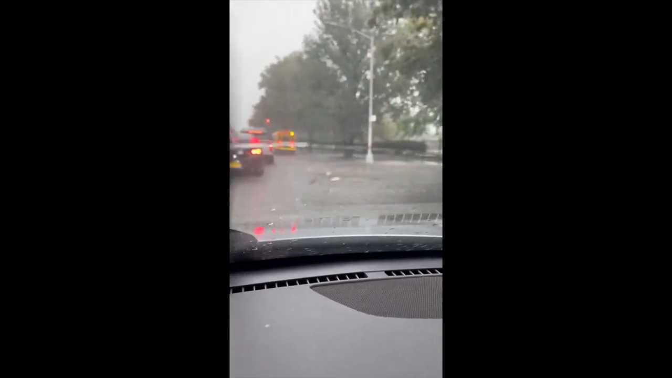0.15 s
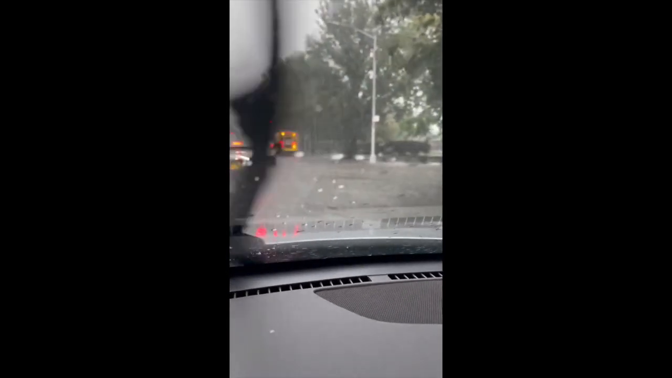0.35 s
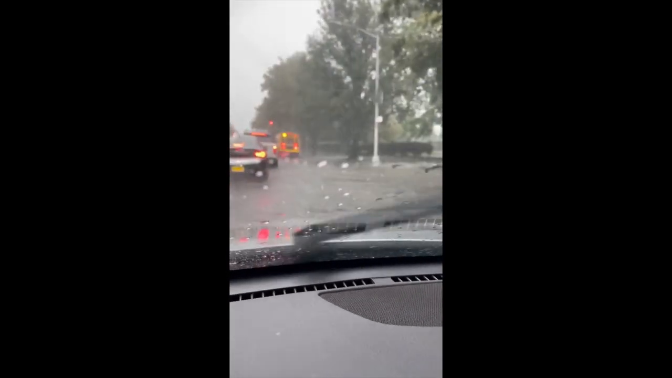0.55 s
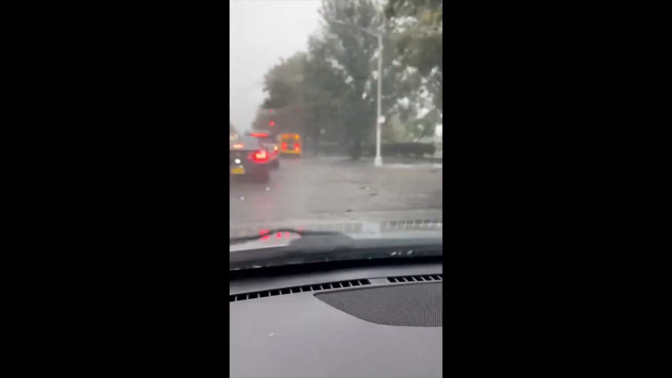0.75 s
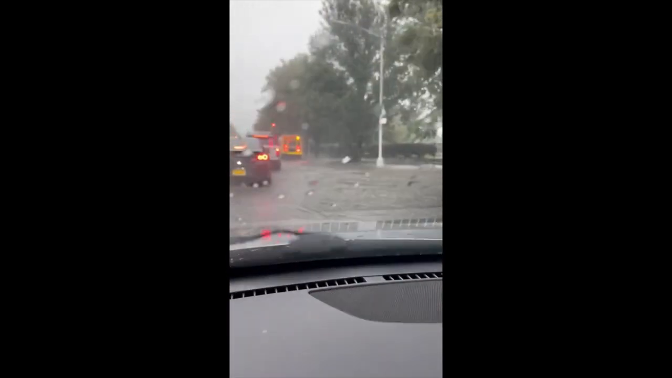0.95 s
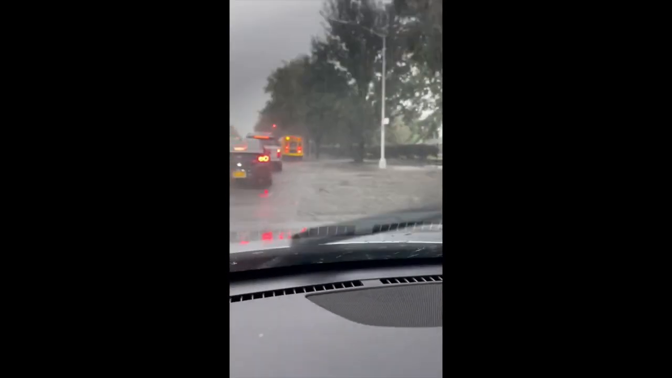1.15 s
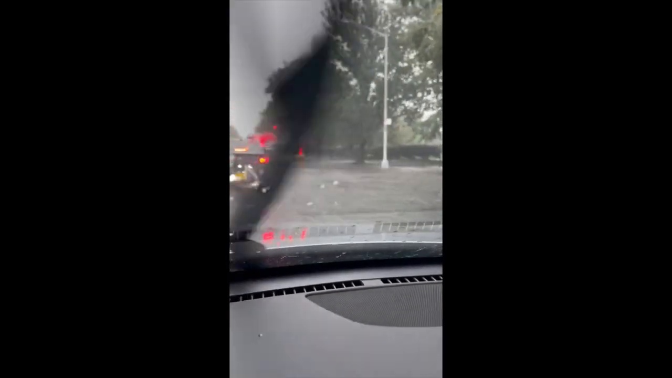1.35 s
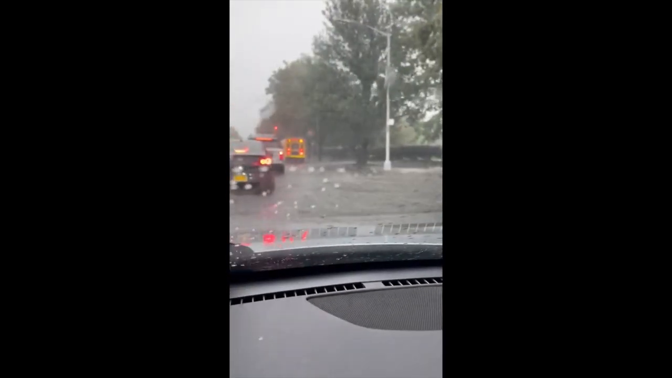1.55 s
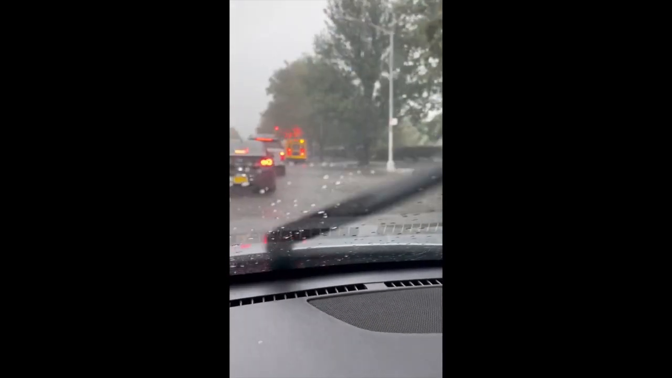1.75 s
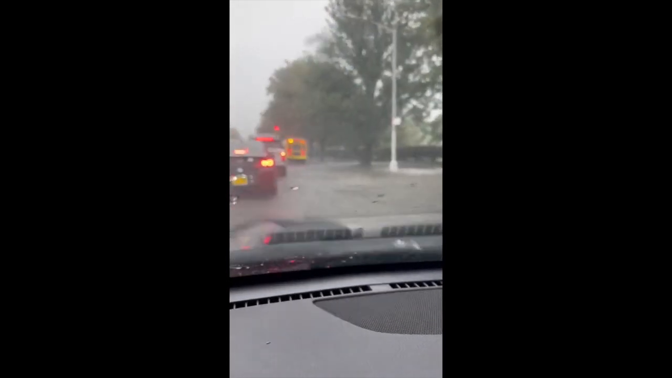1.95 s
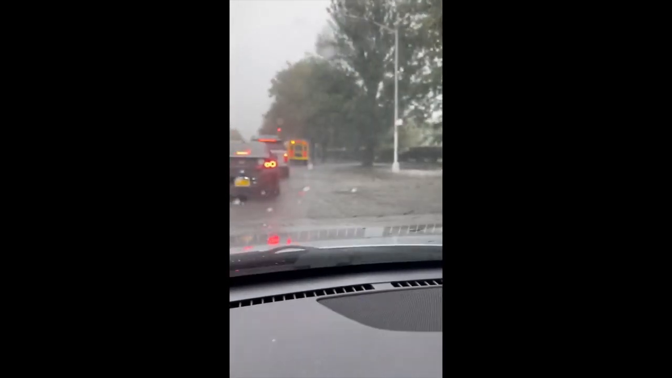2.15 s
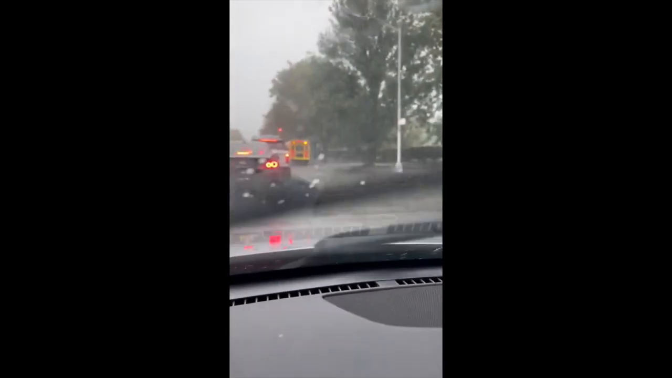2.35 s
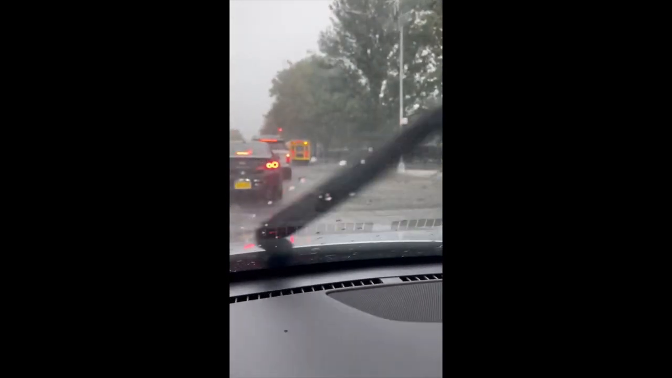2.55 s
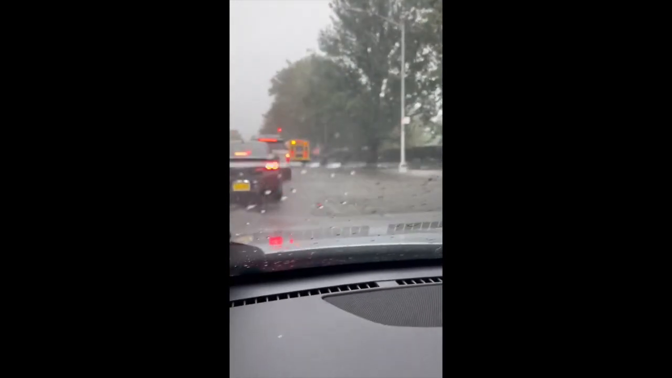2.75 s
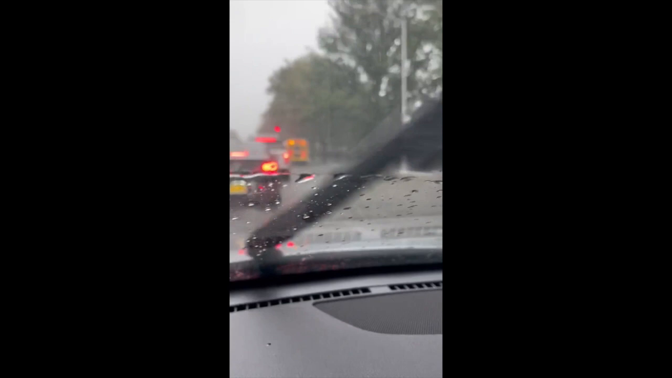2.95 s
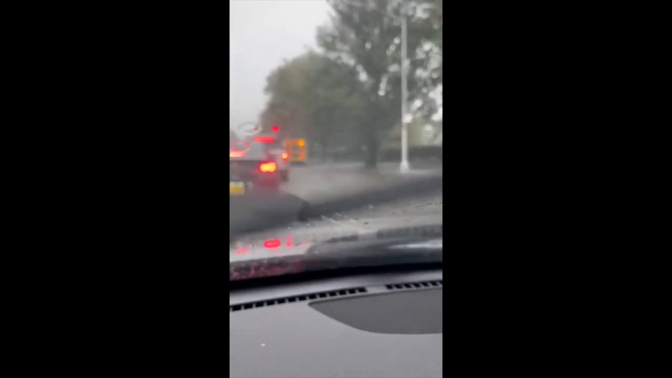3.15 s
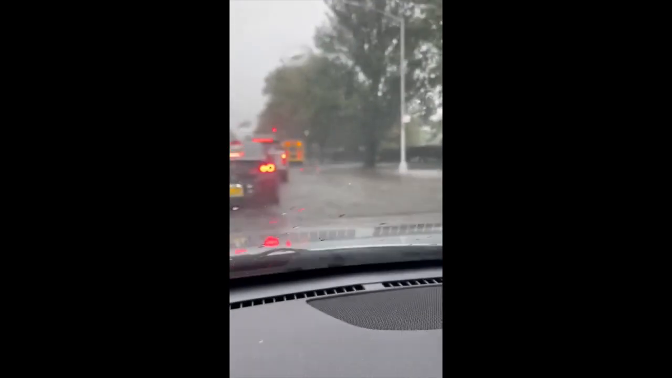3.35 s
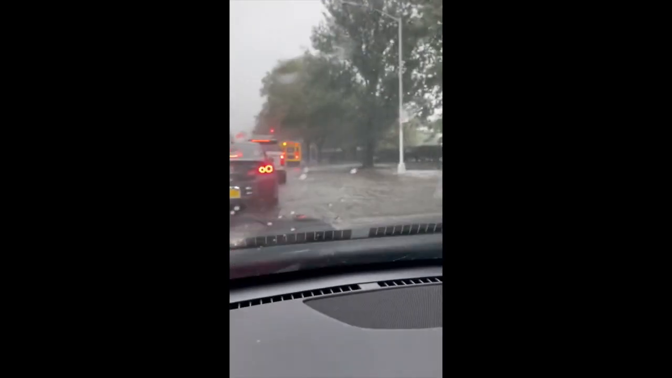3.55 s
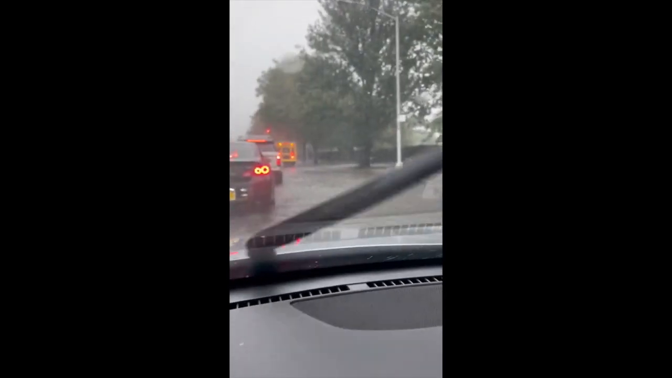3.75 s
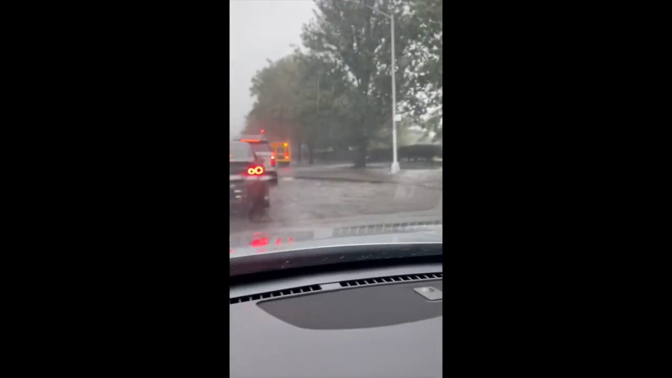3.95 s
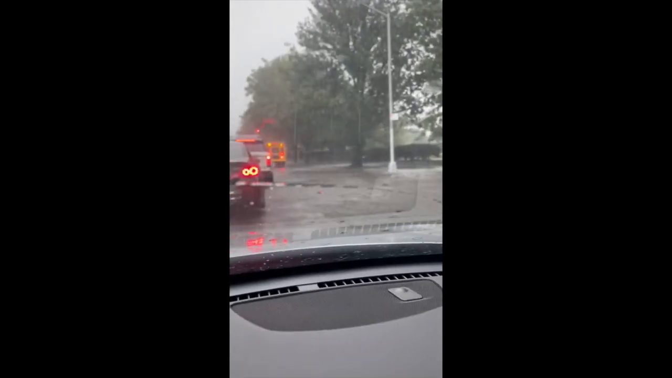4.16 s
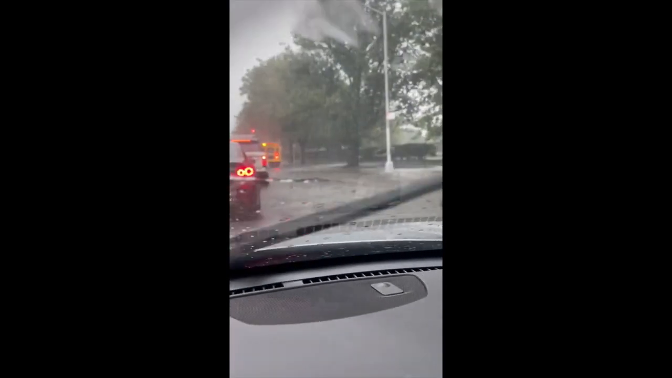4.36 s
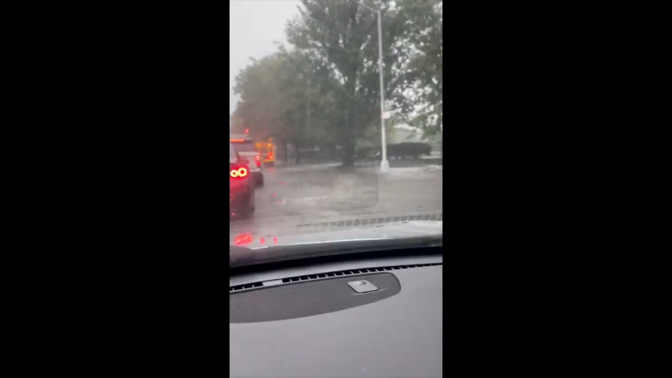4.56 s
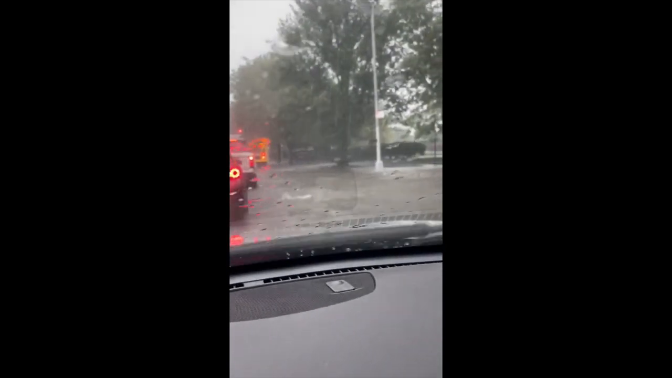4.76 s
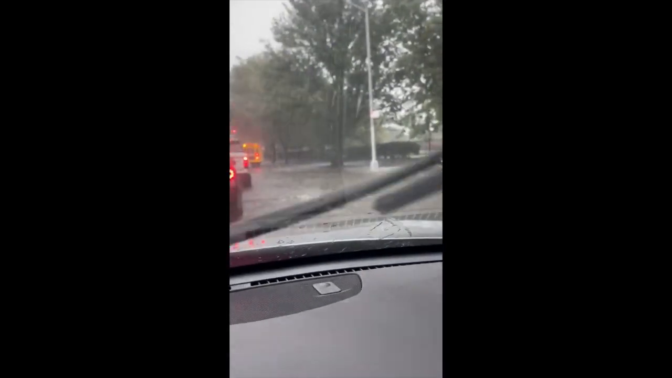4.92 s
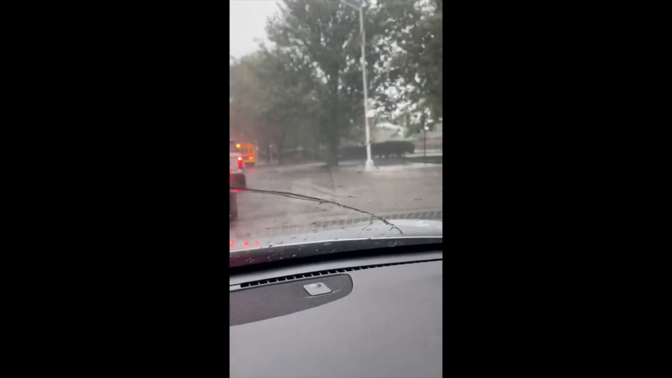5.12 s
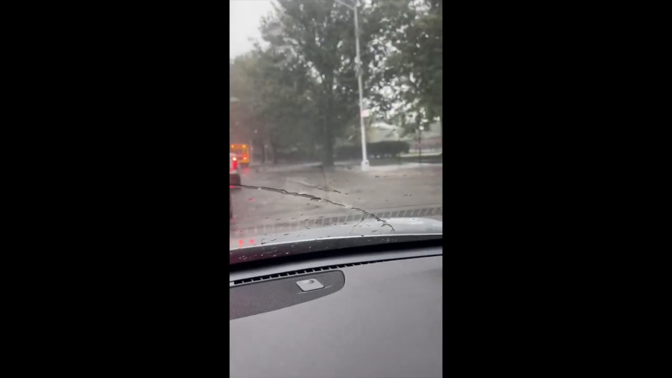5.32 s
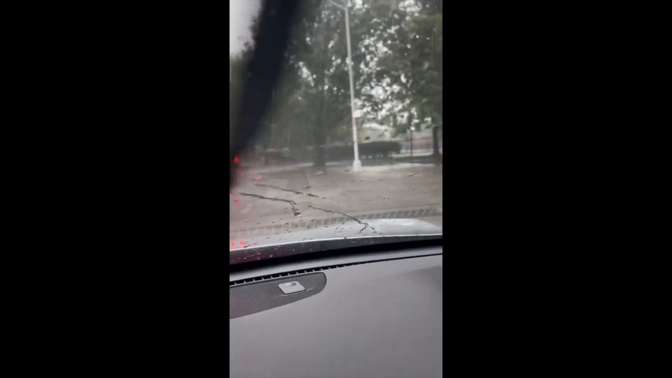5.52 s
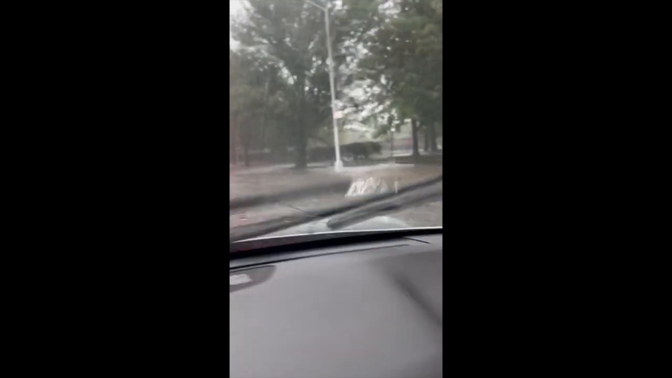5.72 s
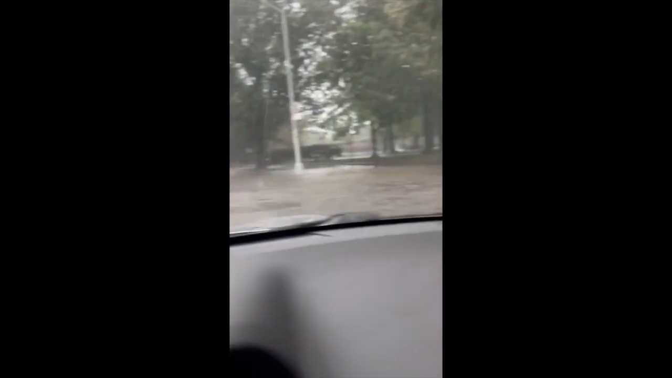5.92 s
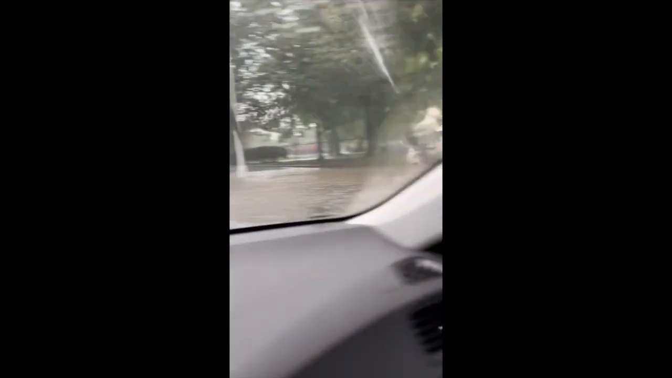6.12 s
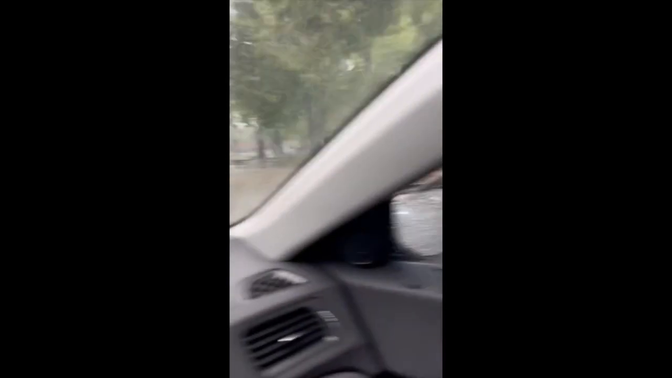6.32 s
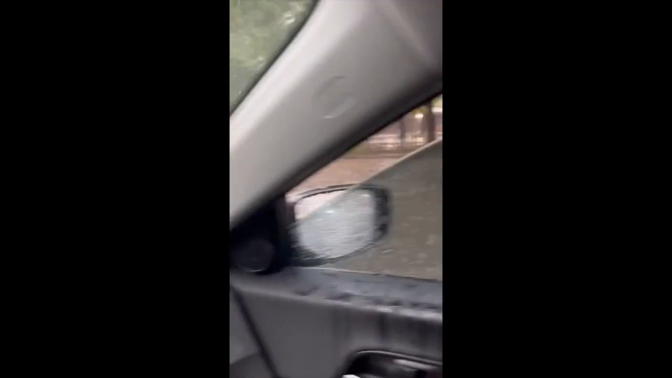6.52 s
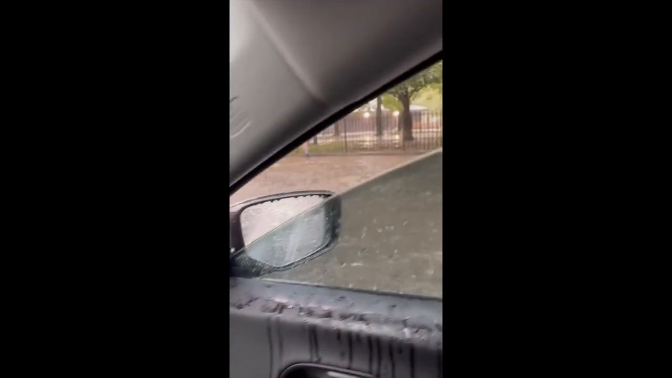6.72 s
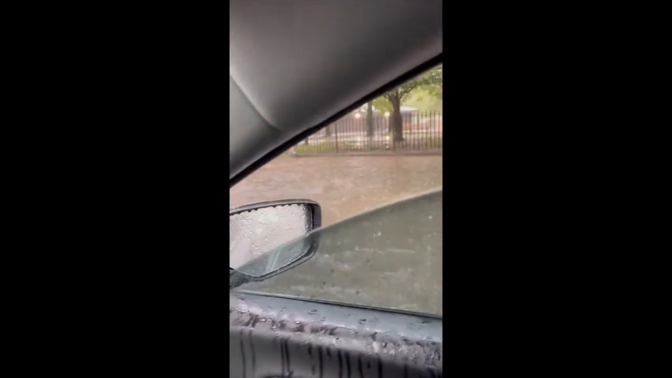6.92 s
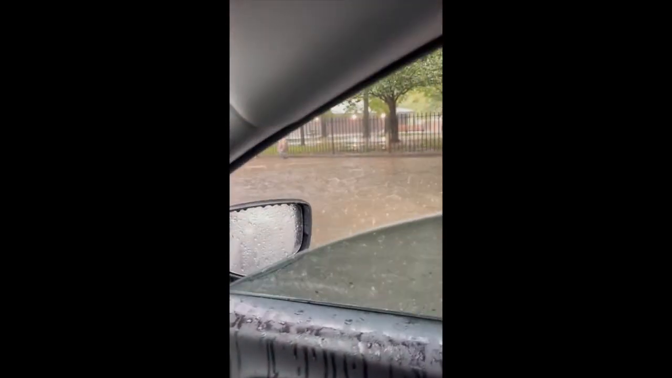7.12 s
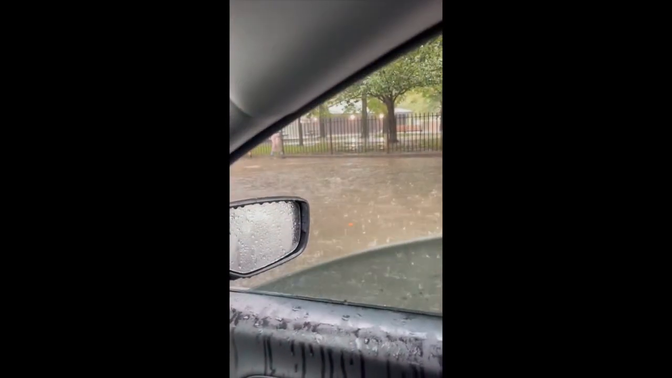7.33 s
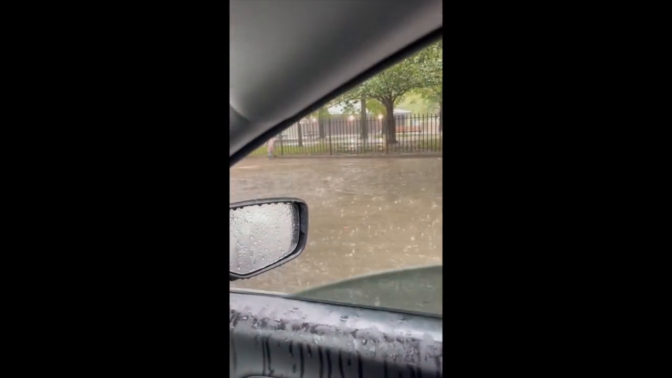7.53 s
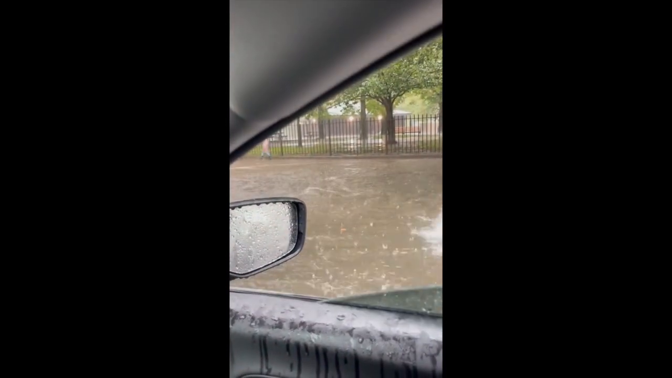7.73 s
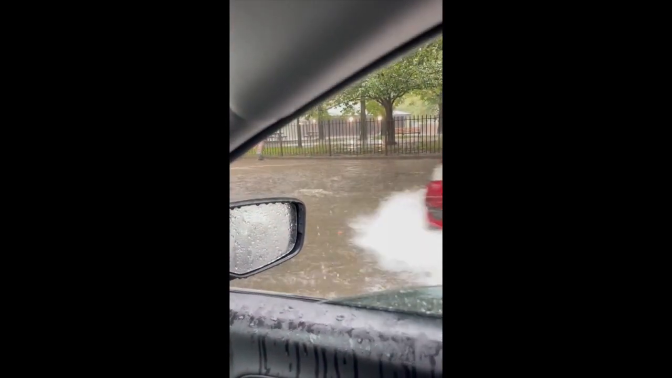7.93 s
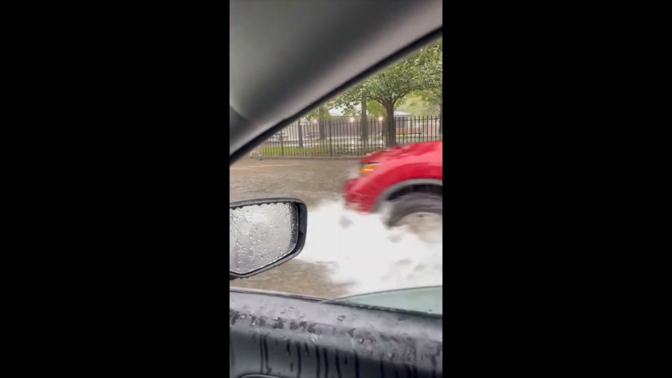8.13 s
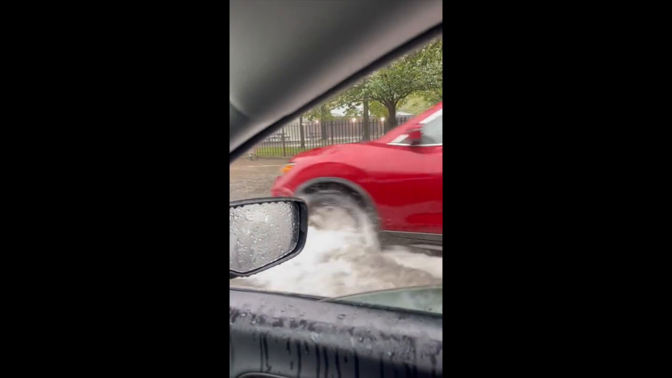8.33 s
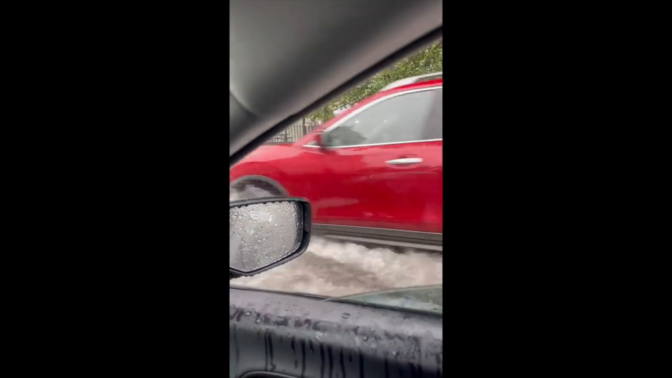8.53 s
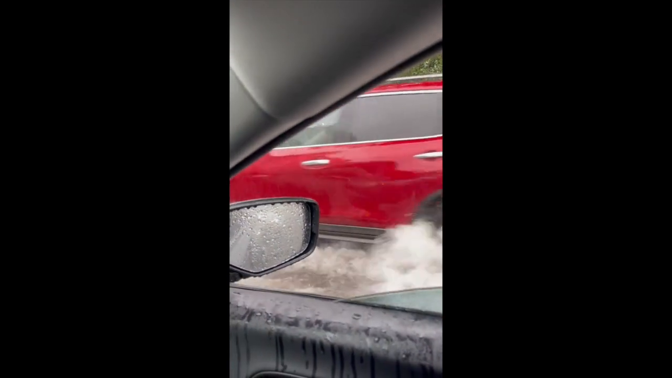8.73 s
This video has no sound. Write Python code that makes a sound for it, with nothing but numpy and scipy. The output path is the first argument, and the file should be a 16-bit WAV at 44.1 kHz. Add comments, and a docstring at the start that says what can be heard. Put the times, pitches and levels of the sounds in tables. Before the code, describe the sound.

From a front seat inside a closed car, rain drums dully on the roof and hisses on the glass above a low engine idle. Fast wipers thump at each end of their sweep, with rubbery judders, chirps and groans. Around six seconds a switch ticks, the side window peels loose and hums down, and bright downpour floods in as a car passes with a churning, splashing wash.

```python
"""Inside a car idling on a flooded street: uneven drops and noise make rain that drums on the roof and hisses
on the glass, over a wavering engine sine. Fast wipers thud through ringing modes at each end of the sweep, rub in
swells of noise and chirp and groan as gliding tones. Near six seconds a switch ticks, a side window peels free and
winds down to a motor hum, and its hollow gap lets in the downpour; a car then ploughs past, its wash made of
filtered noise and its splashes of pitched bubbles."""
import sys
import numpy as np
from scipy import signal
from scipy.fft import rfft, irfft, next_fast_len
from scipy.io import wavfile

SR = 44100
rng = np.random.default_rng(int(sys.argv[2]) if len(sys.argv) > 2 else 0)


def waveform_to_disk(signal):
    """Save audio, clipped to [-1, 1], as 16-bit WAV at the path in sys.argv[1]."""
    frames = np.transpose(np.atleast_2d(signal))
    scaled = np.clip(frames, -1, 1) * 32767
    samples = np.round(scaled).astype(np.int16)
    wavfile.write(sys.argv[1], SR, samples)


N = 387191
TIME = np.arange(N) / SR
SIZE = next_fast_len(N + 4096)
FREQS = np.maximum(np.arange(SIZE // 2 + 1) * SR / SIZE, 1)
TREBLE_HZ, LOW_HZ = (1500, 4000), (250, 900)     # bands in which noise is scaled to unit power

# left-right likeness, cabin shut: freq_hz, likeness (-1 to 1)
SHUT_LIKENESS = [(200, 1), (330, 0.95), (650, 0.49), (1150, 0.029), (1800, 0.85), (2700, -0.39),
                 (4000, 0.48), (5900, 0.89), (7300, 0.87), (9200, 1), (10800, 0.67)]
# left-right likeness, window open: freq_hz, likeness (-1 to 1)
OPEN_LIKENESS = [(250, 1), (650, 0.93), (1900, 0.93), (2600, 0.44), (3500, 0.81), (4600, 0.59),
                 (5900, 0.91), (7300, 0.85), (9200, 1), (10800, 0.72), (12000, 0.62)]
# spectrum of flung water and peeling glass: freq_hz, relative_db_per_hz
WET_SPECTRUM = [(400, 10), (1800, 5), (2700, 6.5), (4500, 3), (7000, 3), (9000, 1), (11500, -26),
                (15000, -56)]
# wiper turns at the top, about every 1.26 s: time_s, rub_db (reference for judder, chirp and groan)
TOP_TURNS = [(.246, -27.5), (1.505, -28), (2.763, -27), (4.025, -29.5), (5.291, -31.5), (6.561, -47),
             (7.827, -36)]
# second blade snaps over in its holder at the bottom, then groans: time_s, clack_db (relative), groan_db
CLACKS = [(.941, -31, -17), (2.205, -23, -15.5), (3.465, -31, -15), (4.726, -18, -15), (5.987, -27.5, -20)]
# window motor: time_s, mean_pitch_hz, mean_level_db
WINDOW_MOTOR = [(6.09, 90, -70), (6.16, 101.9, -51), (6.5, 106.2, -30), (7.0, 104.9, -31),
                (7.6, 104.9, -30.5), (8.1, 101, -31), (8.3, 100, -65)]
WINDOW_START_S = WINDOW_MOTOR[0][0]


def from_db(db):
    """Decibels to amplitude gain."""
    return 10 ** (np.asarray(db) / 20)


def rms_one(x):
    """Scale to unit power."""
    return x / np.sqrt(np.mean(x ** 2) + 1e-20)


def in_time(rows):
    """Interpolate each column of a timed curve at every sample."""
    time_s, *columns = np.transpose(rows)
    return [np.interp(TIME, time_s, column) for column in columns]


def over_hz(points):
    """Interpolate a table on a log-frequency axis."""
    hz, value = np.transpose(points)
    return np.interp(np.log(FREQS), np.log(hz), value)


def drift(knots_per_s):
    """Random curve, linear between normal knots, with spread near 1."""
    knots = rng.standard_normal(4096)
    return np.interp(TIME * knots_per_s, np.arange(len(knots)), knots) * np.sqrt(3 / 2)


def white():
    """Two independent white noises."""
    return rng.standard_normal((2, N))


def coloured(pair, spectrum, likeness, band_hz=None):
    """Shape two white signals to a stereo spectrum as mid and side; unit power overall or inside band_hz."""
    gain = from_db(over_hz(spectrum))
    alike = np.clip(over_hz(likeness), -1, 1)
    inside = 1 if band_hz is None else (FREQS > band_hz[0]) & (FREQS < band_hz[1])
    mid, side = rfft(pair, SIZE) * gain / np.sqrt(np.mean(gain ** 2 * inside))
    mid = mid * np.sqrt((1 + alike) / 2)
    side = side * np.sqrt((1 - alike) / 2)
    return irfft(np.array([mid + side, mid - side]), SIZE)[:, :N]


def drops(per_s, spread_db, t60_s, smooth, spots=10):
    """Uneven hits excite a short noisy ring at each spot, over the steady noise of countless small drops."""
    t = np.arange(2048) / SR
    out = np.zeros((2, N))
    for _ in range(spots):
        size_db = spread_db * np.minimum(rng.exponential(1, N), 4)
        sizes = from_db(size_db) * rng.choice([-1, 1], N)
        hits = sizes * (rng.random(N) < per_s / spots / SR)
        splat = rng.standard_normal((2, len(t))) * from_db(-60 * t / t60_s)
        out += signal.oaconvolve(hits[None], splat, axes=1)[:, :N]
    return rms_one(rms_one(out) + smooth * white())


def plops(per_s, spread_db, cycles, low_hz, high_hz, rise, size=1536):
    """Drops and bubbles ring as decaying sines, each with its own pitch, pan and set rise; unit power."""
    t = np.arange(size) / SR
    out = np.zeros((2, N + size))
    for when, pitch, strength, side in rng.random((20000, 4))[:int(per_s * N / SR)]:
        hz = low_hz * (high_hz / low_hz) ** pitch
        at = int(when * N)
        age = t[:int(cycles / hz * SR) + 1] * hz / cycles     # 0 to 1 over a 60 dB decay
        tone = np.sin(2 * np.pi * cycles * age * (1 + rise * age)) * np.exp(-np.log(1000) * age)
        db = spread_db * min(-np.log(1 - strength), 4)
        pan_db = 2 * (2 * side - 1)
        out[:, at:at + len(age)] += from_db([[db + pan_db], [db - pan_db]]) * tone
    return rms_one(out[:, :N])


def ring(clicks, hz, t60_s):
    """Two-pole resonator: a unit click starts a decaying sine of height 1."""
    r, w = 1000 ** (-1 / (t60_s * SR)), 2 * np.pi * hz / SR
    return signal.lfilter([0, np.sin(w)], [1, -2 * r * np.cos(w), r * r], clicks + 1e-18)


def swells(rows, rise=0.057):
    """Sum of level arches for (start_s, length_s, level_db): a catch over a fraction rise, then easing off."""
    grid_s = TIME[::16]
    rise = np.clip(rise, .02, .6)
    arches = np.zeros(len(grid_s))
    for start_s, length_s, level_db in rows:
        phase = (grid_s - start_s) / length_s
        arches += from_db(level_db) * np.interp(phase, [0, rise, .7, 1.15], [0, 0.85, 0.78, 0.0027])
    return np.interp(TIME, grid_s, arches)


def slips(start_hz, glide_per_s, length_s, jitter, octave_db):
    """Stick-slip tone and its octave; the rate glides and wavers under one arch of level."""
    t = np.arange(8192) / SR
    waver = np.interp(t * 400, np.arange(80), rng.standard_normal(80))
    angle = 2 * np.pi * np.cumsum(start_hz * np.exp(glide_per_s * t) * (1 + jitter * waver)) / SR
    arch = np.sin(np.pi * np.clip(t / min(length_s, t[-1]), 0, 1))
    return arch * (np.sin(angle) + from_db(octave_db) * np.sin(2 * angle))


def rain_on_car(glass_trim_db=1.51, roof_trim_db=0.3, patter_trim_db=-7.0):
    """Drops hiss and patter on the glass and drum, dulled by the lining, on the roof."""
    # rain levels before trims: time_s, glass_hiss_db, roof_drum_db
    rain_levels = [(0, -47, -41), (1, -48.5, -40.5), (2, -49.5, -41.5), (2.8, -49, -41.5),
                   (3.3, -52, -41.5), (3.8, -55, -41), (4.4, -51.5, -43.5), (5.1, -53.5, -42.5),
                   (5.7, -52.5, -45), (6.5, -50, -44)]
    # glass spectrum: freq_hz, relative_db_per_hz
    glass_spectrum = [(300, 15.5), (1000, 5.5), (1700, 0.5), (2700, 0.5), (3500, -1), (5200, -3.5),
                      (8200, -3), (9500, -7.5), (11000, -13.5), (12200, -59), (15000, -46)]
    # roof spectrum: freq_hz, relative_db_per_hz
    roof_spectrum = [(20, -10), (32, -8), (46, 24), (70, 15), (95, 15), (150, 3.5), (200, 7), (300, -0.5),
                     (480, -1.5), (620, -10.5), (740, -3.5), (950, -14), (1600, -20.5), (4000, -79)]
    hiss_db, drum_db = in_time(rain_levels)
    glass_hits = drops(per_s=700, spread_db=4.0, t60_s=0.013, smooth=1.4)
    glass = coloured(glass_hits, glass_spectrum, SHUT_LIKENESS, TREBLE_HZ)
    patter = plops(per_s=160, spread_db=3.0, cycles=46.0, low_hz=900, high_hz=4220, rise=0.0)
    roof_hits = drops(per_s=300, spread_db=2.5, t60_s=0.079, smooth=0.81)
    roof = coloured(roof_hits, roof_spectrum, SHUT_LIKENESS, LOW_HZ)
    on_glass = from_db(glass_trim_db) * glass + from_db(patter_trim_db) * patter
    return from_db(hiss_db) * on_glass + from_db(drum_db + roof_trim_db) * roof


def wipers():
    """The blades thud, clack, rub and squeak at the ends of their sweep."""
    # turns at the bottom: time_s, rub_db (reference for judder)
    bottom_turns = [(.857, -25), (2.115, -31), (3.378, -24.5), (4.640, -30), (5.903, -30)]
    # judder as a blade slows at the top: after_turn_s, length_s, db_re_rub
    top_judder = [(-.079, 0.041, 0.7), (-.038, 0.041, 1.3), (0.075, .022, -3.5)]
    # the same at the bottom: after_turn_s, length_s, db_re_rub
    bottom_judder = [(-.018, 0.017, -6), (.1, 0.034, -16.5)]
    # water flung off at the top: after_turn_s, length_s, level_db
    top_flicks = [(-.043, 0.059, -43), (0.079, 0.02, -46)]
    # the same at the bottom: after_turn_s, length_s, level_db
    bottom_flicks = [(-.02, 0.037, -39), (-.005, 0.0084, -38), (.087, 0.04, -42.5)]
    # one blade thuds over, the other follows, the arms rebound: time_s, boom_db, knock_db (both relative)
    thuds = [(.246, -14, -15), (.321, -13, -14), (.387, -11, -24), (.858, -8, -15), (.918, -12, -21),
             (.977, -9.5, -16.5), (1.505, -12, -10.5), (1.579, -14, -13), (1.636, -19, -19.5),
             (2.116, -9.5, -13), (2.154, -18, -22), (2.177, -13, -25), (2.237, -5, -17), (2.768, -15, -14),
             (2.840, -12.5, -14), (2.903, -17, -23), (3.379, -10, -17), (3.400, -8, -24),
             (3.443, -10, -20.5), (3.502, -12, -14.5), (4.025, -16, -15.5), (4.101, -14.5, -15),
             (4.170, -18, -24), (4.640, -8, -19.5), (4.702, -13, -24), (4.762, -16, -21), (4.787, -11, -27),
             (5.295, -19, -14), (5.365, -17, -18), (5.432, -19, -24.5), (5.907, -15, -21.5),
             (5.927, -6.5, -29), (5.968, -15, -27), (6.050, -12.5, -22), (6.575, -22, -33),
             (6.642, -11, -27.5), (7.178, -10.5, -25.5), (7.250, -22, -19.5), (7.905, -18, -18.5),
             (8.440, -10.5, -28)]
    # groan as a blade halts at the top: after_turn_s, db_re_rub, start_hz, glide_per_s, length_s
    top_groan = (-0.04, 8, 360, -18, 0.13)
    # groan after a clack: after_clack_s, start_hz, glide_per_s, length_s
    bottom_groan = (.005, 225, -7, .05)
    top_rubs, top_flung = sweep_end(TOP_TURNS, top_judder, top_flicks)
    bottom_rubs, bottom_flung = sweep_end(bottom_turns, bottom_judder, bottom_flicks)
    groans = [(s + top_groan[0], rub_db + top_groan[1], *top_groan[2:]) for s, rub_db in TOP_TURNS]
    groans += [(s + bottom_groan[0], db, *bottom_groan[1:]) for s, _, db in CLACKS]
    rubber = wiper_rubber(top_rubs + bottom_rubs, top_flung + bottom_flung)
    return body_thuds(thuds) + blade_clacks() + rubber + squeaks(groans)


def sweep_end(turns, judder, flicks):
    """Each turn at one end repeats the judder at its own rub level and the flicks at set levels."""
    rubs = [(s + after, length, rub_db + db) for s, rub_db in turns for after, length, db in judder]
    flung = [(s + after, length, db) for s, _ in turns for after, length, db in flicks]
    return rubs, flung


def body_thuds(thuds, boom_trim_db=-2.0, flop=0.63, flop_s=0.014, uneven_db=1.5):
    """Each blow and the rubbery flop after it ring the glass and the cabin modes."""
    # windscreen and cabin modes: freq_hz, relative_db, t60_s
    body_modes = [(50.9, -16, 0.78), (68.8, -6, 0.34), (86.9, -8, 0.26), (115, -5.5, 0.28),
                  (143, -13.5, 0.32), (184.9, -3, 0.15), (212.3, -5, 0.093), (257, -8, 0.11),
                  (314.5, -10, 0.083), (450, -18, 0.033), (737, -32.5, 0.12)]
    t = np.arange(4096) / SR
    out = np.zeros(N + SR)
    lip = np.exp(-t / flop_s)
    for k, (hz, mode_db, t60_s) in enumerate(body_modes):
        force = np.zeros(len(out))
        upper = np.clip(np.log2(hz / 100), 0, 1)     # low modes carry the boom, higher ones the knock
        for s, boom_db, knock_db in thuds:
            blow = flop * (1 + upper) / 2 * rng.standard_normal(len(t)) * lip / np.linalg.norm(lip)
            blow[0] += (-1) ** (k // 2)
            level_db = (1 - upper) * (boom_db + boom_trim_db) + upper * knock_db
            level_db += uneven_db * rng.standard_normal()
            at = round(s * SR)
            force[at:at + len(t)] += from_db(level_db + mode_db) * blow
        out += ring(force, hz, t60_s)
    return out[:N]


def modal_hits(times_s, levels_db, hz, t60_s, uneven_db):
    """Clicks of randomly varied strength ring one mode."""
    hits = np.zeros(N)
    hits[(times_s * SR).astype(int)] = from_db(levels_db + uneven_db * rng.standard_normal(len(times_s)))
    return ring(hits, hz, t60_s)


def blade_clacks(uneven_db=4.5):
    """A blade snaps against its plastic holder: short modes ring as one hollow knock."""
    # holder modes: freq_hz, relative_db, t60_s
    holder_modes = [(430, -2, .03), (600, 0, .026), (830, -3, .024), (1500, -24, .018)]
    s, db, _ = np.transpose(CLACKS)
    out = np.zeros(N)
    for k, (hz, mode_db, t60_s) in enumerate(holder_modes):
        out += (-1) ** k * modal_hits(s, db + mode_db, hz, t60_s, uneven_db)
    return out


def wiper_rubber(rubs, flung):
    """Rubber sticks and slips on the glass as stuttering noise and flings water aside."""
    # rubber spectrum: freq_hz, relative_db_per_hz
    rubber_spectrum = [(120, 1.5), (370, 6.5), (520, 5), (640, 0.5), (780, 5), (930, -5), (1130, -5.5),
                       (1500, -21.5), (4000, -63)]
    # left-right likeness of the scrape: freq_hz, likeness (0 to 1)
    scrape_likeness = [(200, 1), (450, 0.64), (900, 0.33), (3000, 0.3)]
    stutter = from_db(.9 * drift(150))
    grains = drops(per_s=830, spread_db=-1.0, t60_s=0.019, smooth=0.82)
    judder = swells(rubs, rise=0.27) * stutter * coloured(grains, rubber_spectrum, scrape_likeness)
    spatter = drops(per_s=900, spread_db=0.0, t60_s=0.022, smooth=1.0)
    flicks = swells(flung, rise=0.069) * coloured(spatter, WET_SPECTRUM, SHUT_LIKENESS)
    return judder + flicks


def squeaks(halts, pitch_spread=0.025, flutter_db=2.0):
    """Wet rubber chirps fitfully upward while it slides, then groans downward as the blade stops."""
    # squeaks as a blade sets off again: start_s, length_s, level_db, start_hz
    setting_off = [(0.376, 0.026, -38, 1900), (2.894, 0.022, -43, 1833)]
    chirp_lead_s, chirp_s, chirp_db_re_rub, chirp_hz = .135, 0.085, -22.5, 1930
    tones = []
    for s, rub_db in TOP_TURNS:
        hz = chirp_hz * (1 + pitch_spread * rng.standard_normal())
        tone = slips(hz, 1.87, chirp_s, jitter=0.05, octave_db=-20)
        flutter = from_db(flutter_db * drift(120)[:len(tone)])
        tones.append((s - chirp_lead_s, rub_db + chirp_db_re_rub, tone * flutter))
    for s, length_s, db, hz in setting_off:
        tones.append((s, db, slips(hz, 1.2, length_s, jitter=.01, octave_db=-15)))
    for s, db, hz, glide_per_s, length_s in halts:
        tones.append((s, db, slips(hz, glide_per_s, length_s, jitter=0.14, octave_db=-15.0)))
    out = np.zeros(N)
    for s, db, tone in tones:
        at = round(s * SR)
        out[at:at + len(tone)] += from_db(db) * tone[:N - at]
    return out


def street(wash_trim_db=-1.0, splash_trim_db=-3.0, gurgle_trim_db=-4.0, opening_s=0.29,
           churn_db=0.7, surge_db=0.2):
    """The first gap lets in bright hiss and splashing; the passing car's wash churns and gurgles below it."""
    # rain through the window: time_s, level_db
    rain_level = [(6.1, -44), (6.35, -52.5), (6.7, -44), (7.15, -39.5), (7.5, -34.5), (7.85, -31),
                  (8.2, -30.5), (8.5, -31.5), (8.78, -32.5)]
    # low rush of water pushed by the car, before trim: time_s, level_db
    wash_level = [(6.1, -39), (6.4, -46.5), (6.8, -37.5), (7.12, -32), (7.28, -29.5), (7.45, -29.5),
                  (7.8, -25.5), (8.1, -27.5), (8.35, -26.5), (8.55, -24.5), (8.78, -25.5)]
    # water thrown by its wheels, before trims: time_s, level_db
    splash_level = [(6.1, -37), (6.4, -45), (6.65, -46.5), (6.9, -38.5), (7.05, -42), (7.4, -35.5),
                    (7.8, -31.5), (8.15, -30), (8.5, -28.5), (8.78, -34)]
    # downpour spectrum: freq_hz, relative_db_per_hz
    downpour_spectrum = [(100, 3), (400, 3), (1200, 3), (1700, 0.5), (2500, 0), (4000, 0.5), (5000, -0.5),
                         (6500, 1.5), (8000, 4.5), (9500, 2.5), (11000, -5.5), (13400, -21.5), (15000, -45)]
    # wash spectrum: freq_hz, relative_db_per_hz
    wash_spectrum = [(40, -37), (80, 3), (125, 7.5), (155, -0.5), (186, 6.5), (220, -4), (300, 2),
                     (440, -3.5), (680, -9), (1150, -12), (1700, -20.5), (4000, -41.5)]
    (hiss_db,), (wash_db,), (thrown_db,) = in_time(rain_level), in_time(wash_level), in_time(splash_level)
    gap = np.clip((TIME - WINDOW_START_S) / opening_s, 0, 1)
    rain_hits = drops(per_s=2000, spread_db=1.0, t60_s=0.011, smooth=1.17)
    rain = coloured(rain_hits, downpour_spectrum, OPEN_LIKENESS, TREBLE_HZ)
    wash_hits = drops(per_s=1100, spread_db=1.5, t60_s=0.05, smooth=0.87)
    wash = coloured(wash_hits, wash_spectrum, OPEN_LIKENESS, LOW_HZ)
    splashes = plops(per_s=1300, spread_db=1.0, cycles=17.0, low_hz=557, high_hz=3800, rise=0.034)
    gurgles = plops(per_s=130, spread_db=2.0, cycles=37.0, low_hz=519, high_hz=1595, rise=0.064, size=4096)
    clumps = from_db(gurgle_trim_db + 2 * drift(20))     # big bubbles come in clumps
    thrown = from_db(splash_trim_db) * splashes + clumps * gurgles
    water = from_db(wash_db + wash_trim_db + churn_db * drift(22)) * wash
    water += from_db(thrown_db + surge_db * drift(14)) * thrown
    return gap * (from_db(hiss_db) * rain + water)


def water_surges():
    """Each sheet of water thrown by the wheels lands as a dense burst of bubbles."""
    # sheets slapping down: start_s, length_s, level_db
    surges = [(6.67, 0.064, -40), (6.91, .06, -33), (7.2, 0.067, -37), (7.46, .09, -30.5), (7.73, .1, -29),
              (8.06, .09, -28), (8.19, .07, -29), (8.3, 0.15, -32), (8.48, 0.097, -31)]
    bubbles = plops(per_s=1400, spread_db=1.0, cycles=11.0, low_hz=480, high_hz=2290, rise=0.088)
    return swells(surges, rise=0.23) * bubbles


def side_window(second_db=-26.0, shake_db=1.0):
    """The glass peels from its seal with a jolt, and the motor hums while it winds down."""
    # glass peeling out of its seal: start_s, length_s, level_db
    peels = [(6.086, 0.031, -36), (6.118, 0.062, -33.5), (6.22, 0.03, -46), (6.3, 0.037, -42)]
    # mechanism jolts the door as the glass comes free: time_s, boom_db, knock_db (both relative)
    jolt = (6.133, -12, -26.5)
    hz, motor_db = in_time(WINDOW_MOTOR)
    angle = 2 * np.pi * np.cumsum(hz * (1 + 0.014 * drift(18))) / SR
    tone = np.sin(angle) + from_db(second_db) * np.sin(2 * angle)
    hum = from_db(motor_db + shake_db * drift(7.6)) * tone * (TIME > WINDOW_START_S)
    peeling = swells(peels) * coloured(white(), WET_SPECTRUM, SHUT_LIKENESS)
    return hum + peeling + body_thuds([jolt])


def narrow_gap(rise_per_s=0.09, waver_db=4.5):
    """The slot gives outside noise a hollow ring; reading it ever faster raises the pitch as it widens."""
    # hollow spectrum before the rise: freq_hz, relative_db_per_hz
    slot_spectrum = [(900, -11), (1130, -10), (1350, -7), (1600, 1), (1740, -15), (1880, 9), (2100, -1),
                     (2380, 7.5), (2800, -21), (3550, -23), (4300, -29), (7000, -44)]
    # mean level of the hollow noise: time_s, level_db
    slot_level = [(6.1, -59), (6.4, -52.5), (6.9, -50), (7.3, -42.5), (7.8, -44)]
    slot_db, = in_time(slot_level)
    is_open = TIME > WINDOW_START_S
    widening_s = np.maximum(TIME - slot_level[1][0], 0)
    read_at = np.cumsum(np.exp(rise_per_s * widening_s) * is_open)
    noise = coloured(white(), slot_spectrum, OPEN_LIKENESS)
    hollow = np.array([np.interp(read_at, np.arange(N), side) for side in noise])
    return is_open * from_db(slot_db + waver_db * drift(25)) * hollow


def door_rattle(uneven_db=2.0):
    """The loosened glass and its runners rattle in the door; every touch rings the modes differently."""
    # touches of glass on runners: time_s, relative_db
    touches = [(6.088, -32.5), (6.092, -37), (6.127, -39), (6.136, -38), (6.149, -39), (6.163, -40),
               (6.226, -39), (6.308, -42)]
    # glass and runner modes: freq_hz, relative_db, t60_s
    door_modes = [(1740, -16, 0.035), (2100, -9, .05), (2560, -4, .03), (3420, -0.5, 0.035),
                  (3700, -19, 0.037), (5460, -10, .03), (6010, -10, 0.018)]
    s, db = np.transpose(touches)
    out = np.zeros(N)
    for hz, mode_db, t60_s in door_modes:
        out += modal_hits(s, db + mode_db, hz, t60_s, uneven_db)
    return signal.sosfilt(signal.butter(4, 7500, fs=SR, output="sos"), out)


def ticks(t60_s=0.022, cycles=29.0, top_hz=10500):
    """Hard plastic taps: band noise dies quickly in the padded cabin; low ones ring a little longer."""
    # small sharp ticks, the loudest from the window switch: time_s, relative_db, band_hz
    taps = [(1.821, -27.5, 8050), (3.614, -38, 7340), (3.643, -44, 7450), (6.022, -20.5, 8400),
            (6.091, -25.5, 800), (6.312, -24, 490)]
    t = np.arange(4096) / SR
    out = np.zeros(N)
    for s, db, hz in taps:
        band_hz = np.clip([hz * .72, hz * 1.3], 100, .45 * SR)
        sos = signal.butter(2, band_hz, "band", fs=SR, output="sos")
        crack = signal.sosfilt(sos, rng.standard_normal(len(t)))
        decay = from_db(-60 * t / (t60_s + cycles / hz))
        at = round(s * SR)
        out[at:at + len(t)] += from_db(db) * rms_one(crack) / 2 * decay
    return signal.sosfilt(signal.butter(4, top_hz, fs=SR, output="sos"), out)


def engine(mean_hz=49.44, wander=0.036):
    """The idle booms in the cabin as a sine of wandering pitch and uneven level."""
    # idling engine: time_s, level_db
    idle_level = [(0, -27), (2, -33), (3.4, -34), (4.4, -36), (5.7, -32), (6.4, -29), (7.3, -48),
                  (8.3, -38), (8.78, -24.5)]
    idle_db, = in_time(idle_level)
    turns = np.cumsum(mean_hz * (1 + wander * drift(12))) / SR
    return from_db(idle_db) * np.sin(2 * np.pi * turns)


def scene():
    """Everything as it reaches the front seat."""
    inside = rain_on_car() + engine() + wipers() + ticks()
    return inside + side_window() + street() + water_surges() + door_rattle() + narrow_gap()


def record(dry, low_cut_hz=21.0, cutoff_hz=14900):
    """Two ports: left fuller in the midrange, right lagging in the treble; deep rumble and the top are cut."""
    # left port's excess over the right: freq_hz, level_db
    lean = [(80, .1), (300, .9), (700, 2.4), (1100, 3.6), (1700, 0)]
    # phase lag of the right port: freq_hz, lag_rad
    port_lag = [(0, 0), (2000, 0), (2700, .9), (3500, .45), (4300, 1), (4850, 3.1), (5700, 6.25),
                (6200, 6.35), (8700, 9.3), (9600, 9.5), (11000, 11), (11700, 12.56)]
    high_pass = signal.butter(2, low_cut_hz, "high", fs=SR, output="sos")
    left, right = rfft(signal.sosfilt(high_pass, dry), SIZE)
    lift = from_db(over_hz(lean) / 2)
    lag = np.exp(-1j * np.interp(FREQS, *np.transpose(port_lag)))
    heard = irfft(np.array([left * lift, right * lag / lift]), SIZE)[:, :N]
    return signal.sosfilt(signal.ellip(10, .2, 80, cutoff_hz, fs=SR, output="sos"), heard)


dry = scene()
out = record(dry)
waveform_to_disk(out)
```